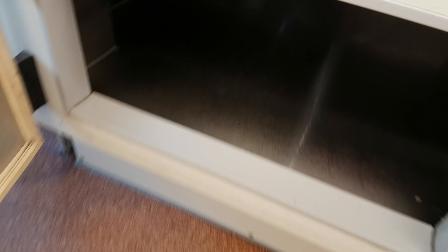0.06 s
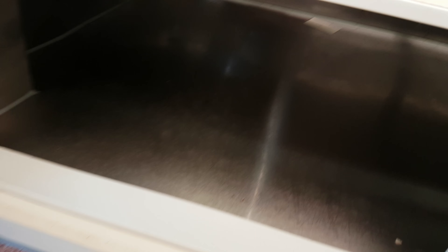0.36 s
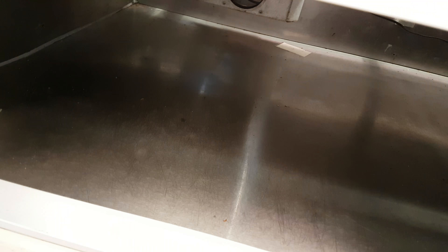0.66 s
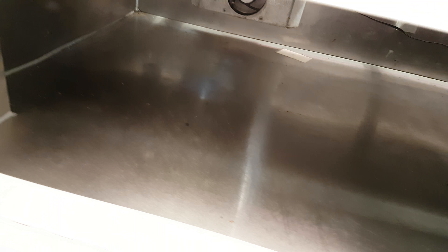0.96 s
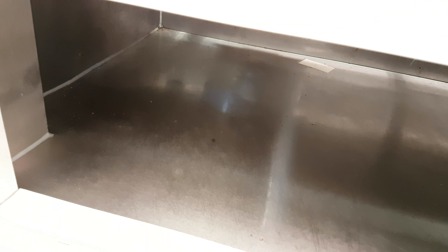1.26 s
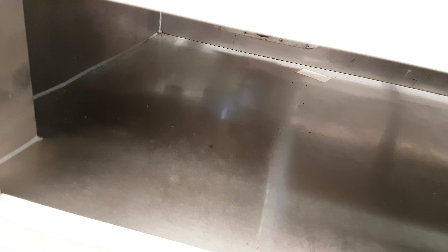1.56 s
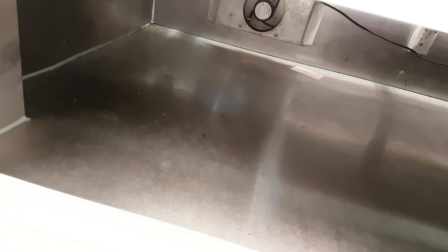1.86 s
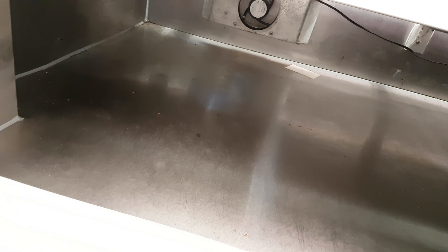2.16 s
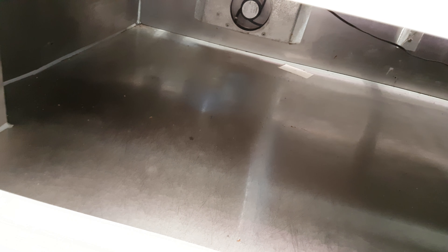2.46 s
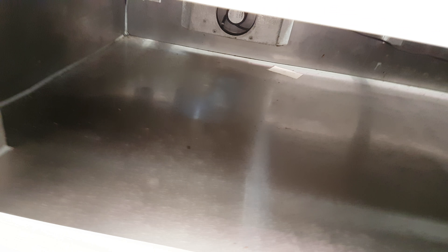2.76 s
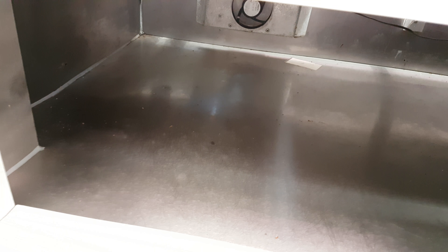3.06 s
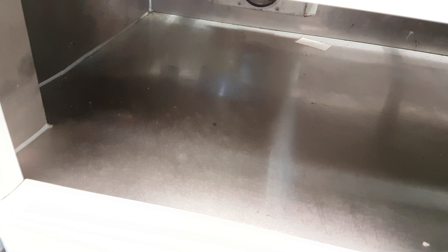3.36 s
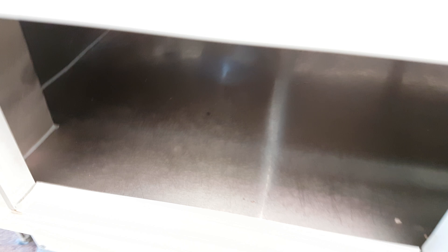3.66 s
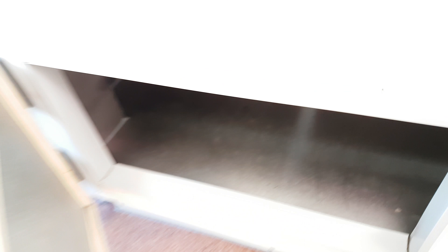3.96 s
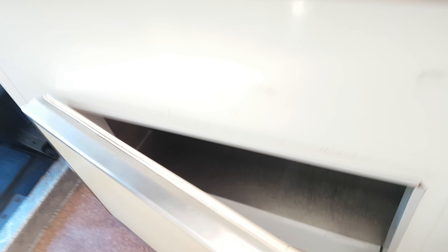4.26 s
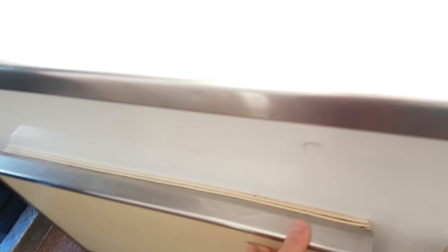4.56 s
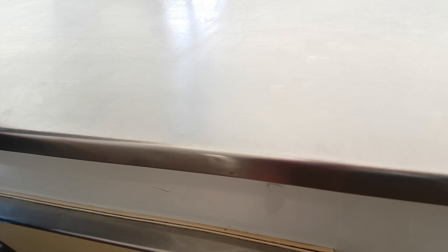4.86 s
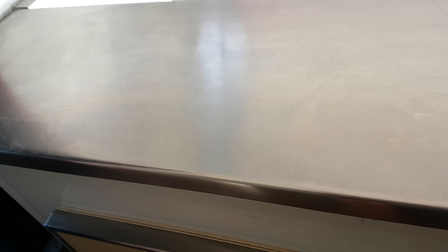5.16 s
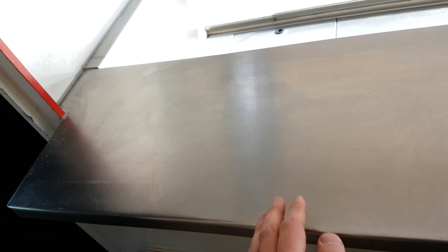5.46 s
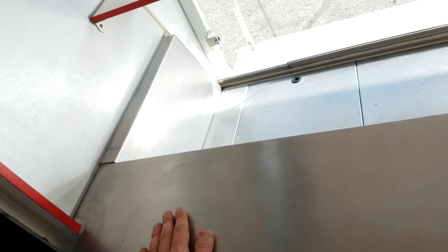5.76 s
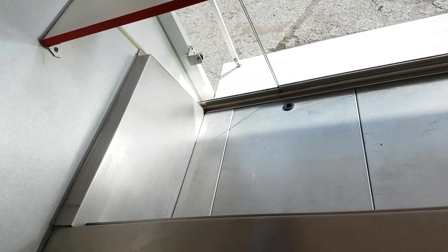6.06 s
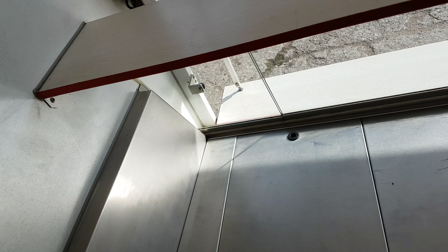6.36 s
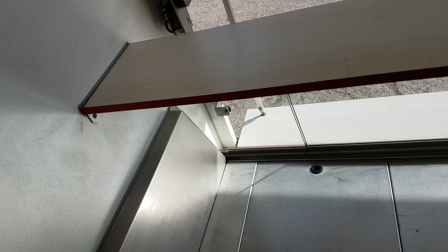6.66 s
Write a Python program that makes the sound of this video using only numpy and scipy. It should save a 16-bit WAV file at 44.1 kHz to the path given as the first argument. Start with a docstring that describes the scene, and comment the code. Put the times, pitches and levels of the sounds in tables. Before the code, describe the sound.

A small engine drones steadily, heard from inside a catering van, with a booming low hum, light clatter and faintly singing metal panels. After about four and a half seconds a steel cabinet door slams close to the microphone, with a sharp latch crack and a short ring. The hum dips and returns less boomy. A hand bumps the steel counter several times and slides briefly across it.

```python
"""Catering van, engine and cabinet door

A phone microphone starts at an open steel cold cabinet, where a small single-cylinder engine running
by the van booms; thin panels sing when its speed suits them. The cabinet door slams close by, and the
phone's gain control ducks and recovers. A hand bumps and slides over the steel counter while the phone
moves out of the boom towards the hatch."""
import sys
import numpy as np
from scipy import signal
from scipy.fft import rfft, irfft
from scipy.io import wavfile
from scipy.ndimage import uniform_filter1d

SR = 44100
rng = np.random.default_rng(int(sys.argv[2]) if len(sys.argv) > 2 else 0)


def master(y):
    """Save y as 16-bit WAV."""
    cut = np.clip(np.atleast_2d(y).T, -1, 1)
    pcm = np.round(cut * 32767)  # scale
    wavfile.write(sys.argv[1], SR, pcm.astype(np.int16))


N = 300762
T = np.arange(N) / SR
FREQS = np.maximum(np.arange(N // 2 + 1) * SR / N, 1)

# the phone's two microphone ports: frequency_hz, likeness (-1 to 1), left_minus_right_db
PORTS = [(60, .9, -1), (200, .95, -1), (380, .86, -1.8), (700, .55, -2.2), (1300, -.03, -5.5),
         (2400, -.05, -5.5), (4400, 0, -3.8), (8000, .05, -1), (15000, .05, .8)]


def undb(db):
    """Decibels to gain."""
    return np.exp(np.asarray(db) * (np.log(10) / 20))


def level(x, db):
    """Scale to an rms level."""
    return x * undb(db) / np.sqrt(np.mean(x ** 2))


def curves(rows):
    """Columns of a time table at every sample."""
    times, *columns = np.transpose(rows)
    return [np.interp(T, times, column) for column in columns]


def at_hz(rows, hz, column=1):
    """A column of a frequency table, read on a log axis."""
    rows = np.array(rows)
    return np.interp(np.log(hz), np.log(rows[:, 0]), rows[:, column])


def colour(x, rows):
    """Filter by a spectrum of (Hz, dB) points."""
    return irfft(rfft(x) * undb(at_hz(rows, FREQS)), N)


def band(x, hz, octaves):
    """Band-pass that keeps the level of white noise."""
    edges = np.minimum(hz * 2 ** (np.array([-octaves, octaves]) / 2), SR / 2 - 1)
    passed = signal.sosfilt(signal.butter(3, edges, "band", fs=SR, output="sos"), x)
    return passed * np.sqrt(SR / 2 / np.ptp(edges))


def walk(rate_hz):
    """Smooth random drift with unit rms."""
    knots = np.arange(0, T[-1] + 1, .5 / rate_hz)
    return level(np.interp(T, knots, rng.standard_normal(len(knots))), 0)


def decay(age, t60):
    """Exponential fall of 60 dB in t60 seconds."""
    return np.exp(-np.log(1000) * age / t60)


def fade(start_s, t60):
    """Sudden onset, exponential decay; silent after twice the decay time."""
    age = T - start_s
    return ((age >= 0) & (age < 2 * t60)) * decay(np.maximum(age, 0), t60)


def swell(centre_s, width_s):
    """A smooth rise and fall around a moment."""
    return np.exp(-((T - centre_s) / width_s) ** 2 / 2)


def ports(pair):
    """Two unrelated signals become a diffuse field at the phone: alike in the bass, brighter right."""
    a, b = rfft(pair)
    likeness = at_hz(PORTS, FREQS)
    mid, side = a * np.sqrt((1 + likeness) / 2), b * np.sqrt((1 - likeness) / 2)
    lean = undb(at_hz(PORTS, FREQS, column=2) / 2)
    return irfft(np.array([(mid + side) * lean, (mid - side) / lean]), N)


def tone(phase, hz):
    """A partial at both ports; above the bass the right port leads further in phase."""
    skew = np.arccos(at_hz(PORTS, hz)) / 2
    lean = undb(at_hz(PORTS, hz, column=2) / 2)
    return np.sqrt(2) * np.array([np.sin(phase - skew) * lean, np.sin(phase + skew) / lean])


def noise():
    """Diffuse white noise at the phone."""
    return ports(rng.standard_normal((2, N)))


def resonance_lags(levels_db):
    """Phase of each order when one pulse a cycle rings a causal body with these levels."""
    log_gain = np.log(undb(levels_db))
    mirrored = np.concatenate([log_gain[:1], log_gain, log_gain[-1:], log_gain[::-1]])
    return -signal.hilbert(mirrored).imag[1:]


def engine_hum(turns, rate_hz, place, waver_db=1.5, boom_waver_db=0.18, uneven=0.019):
    """Orders of the firing rate change with place; the fifth and sixth boom and beat once a cycle."""
    # standing waves give each place its own mix: order, cabinet_db, counter_db, hatch_db
    orders = [(1, -41.5, -48, -46), (2, -39.5, -40, -41), (3, -48.5, -34.5, -36.5), (4, -29, -41.5, -29),
              (5, -21.5, -36, -40), (6, -12, -21, -33), (7, -40.5, -39, -53), (8, -29.5, -37.5, -44.5),
              (9, -32, -32, -33), (10, -39.5, -48, -49), (11, -36, -41, -36.5), (12, -46, -40, -38.5),
              (14, -55, -50.5, -44), (17, -47.5, -48, -62), (18, -50, -42.5, -49.5), (19, -51.5, -46, -52)]
    lags = resonance_lags(np.array(orders)[:, 1])
    out = 0
    for (order, *place_db), lag in zip(orders, lags):
        gain = np.interp(place, np.arange(3), undb(place_db))
        drift_db = (boom_waver_db if order in (5, 6) else waver_db) * walk(2.1)
        smear = .585 * order ** 2  # the way through the bodywork spreads each firing in time
        phase = 2 * np.pi * order * turns + lag - smear
        out = out + gain * undb(drift_db) * tone(phase, order * rate_hz)
    return out * (1 + uneven * walk(30))  # no two firings are equally strong


def engine_clatter(turns, rate_hz, rush_db=-32.5, rattle_db=-39.5, throb=0.055, flicker_db=0.35):
    """Valve gear repeats its rattle every cycle; exhaust and cooling air rush in throbs."""
    # spectrum of rattle and rush: frequency_hz, density_db
    spectrum = [(30, -13.5), (70, 0), (150, 8), (280, 6), (450, -3.5), (720, -9), (1000, -10.5),
                (1300, -10.5), (1700, -16), (2500, -22.5), (4500, -32), (6000, -41), (8500, -50),
                (15000, -48.5)]
    cycle_samples = int(SR / rate_hz)
    cycle = rng.standard_normal((2, cycle_samples))
    rattle = ports(cycle[:, (turns % 1 * cycle_samples).astype(int)])
    rattle = level(colour(rattle, spectrum), rattle_db)
    rattle = signal.sosfilt(signal.butter(4, 480, "high", fs=SR, output="sos"), rattle)
    pulsing = 1 + throb * (np.cos(2 * np.pi * 3 * turns) + np.cos(2 * np.pi * 4 * turns) / 2)
    rush = level(colour(noise() * pulsing, spectrum), rush_db)
    return rattle + rush * undb(flicker_db * walk(9.8))


def singing_panels(turns, rate_hz, place, q=110, waver_db=1.5):
    """Thin panels sing at the nearest engine order, louder as the speed brings it into tune."""
    # panel resonances when in tune: pitch_hz, cabinet_db, outside_db
    resonances = [(331, -39, -42), (376.5, -39, -44), (454, -49, -45), (602.5, -47, -48), (654, -57, -58),
                  (888, -51, -49), (909, -54, -58), (1238, -54, -58), (1260, -53, -58), (1365, -57, -54)]
    out, outside = 0, np.clip(place, 0, 1)
    for hz, cabinet_db, outside_db in resonances:
        order = round(hz / rate_hz.mean())
        detune = 2 * q * (order * rate_hz / hz - 1)
        db = (1 - outside) * cabinet_db + outside * outside_db + waver_db * walk(8.6)
        phase = 2 * np.pi * order * turns - np.arctan(detune)
        out = out + undb(db) / np.hypot(1, detune) * tone(phase, hz)
    return out


def handling_rustles(friction):
    """Soft handling rustles with three faint narrow bands of high hiss."""
    # each rustle: centre_s, width_s, level_db
    rustles = [(0.252, 0.31, -60), (.5, 0.021, -59.5), (0.822, .015, -59.5), (2.814, 0.041, -57),
               (5.41, 0.12, -53.5), (6.555, 0.12, -58)]
    # their spectrum: frequency_hz, density_db
    spectrum = [(800, -11), (2000, 3), (3800, 3.5), (6000, -3.5), (8300, -11), (9500, -16.5),
                (15000, -11.5)]
    # narrow bands of hiss: centre_hz, relative_db
    hiss_bands = [(3700, -13), (6050, -18.5), (8300, -26)]
    narrow_hiss = sum(undb(db) * band(friction, hz, octaves=0.055) for hz, db in hiss_bands)
    envelope = sum(undb(db) * swell(centre_s, width_s) for centre_s, width_s, db in rustles)
    return (level(colour(friction, spectrum), 0) + narrow_hiss) * envelope


def counter_taps():
    """Short, well damped bumps on the counter, each in its own broad band."""
    # each bump: start_s, level_db, centre_hz, width_octaves, t60_s
    bumps = [(3.952, -63, 4500, 2, .12), (5.487, -19, 70, 2.3, 0.45), (5.489, -30, 690, 0.72, 0.031),
             (5.522, -22, 330, 1.7, 0.038), (5.571, -22.5, 281, 1.9, 0.036), (5.812, -32, 910, 1.88, 0.27),
             (5.822, -43, 1620, 1.1, 0.19), (6.030, -19, 950, 2.47, 0.0085)]
    source, out = noise(), np.zeros((2, N))
    for start_s, db, hz, octaves, t60 in bumps:
        span = (T >= start_s) & (T < start_s + .5)
        burst = source[:, span] * decay(T[span] - start_s, t60)
        out[:, span] += undb(db) * band(burst, hz, octaves)
    return out


def latch_crack(start_s, level_db=3, t60=0.01):
    """The latch strikes with a brief, bright burst."""
    # spectrum of the crack: frequency_hz, density_db
    spectrum = [(200, -14), (700, 2), (1100, 19), (1800, 4), (3200, -8), (4300, -19), (5800, 1.5),
                (6700, -15), (7700, -9), (10000, -24), (15500, -13)]
    return level(colour(noise(), spectrum), level_db) * fade(start_s, t60)


def door_ring(blows, span, gain_db=-8, rise_cycles=0.99):
    """Each blow rings door and cabinet; a longer contact leaves the high modes still."""
    # door and cabinet modes: pitch_hz, relative_db, t60_s
    modes = [(70.3, -11, 0.33), (109, -16, 0.095), (170.9, -0.5, 0.48), (210.3, -2, 0.27),
             (263.7, -8, 0.36), (306, -15.5, 0.36), (344, -13, 0.4), (489, -19, 0.36), (966, -20.5, .1),
             (1030, -15.5, 0.26), (1134, -14, 0.22), (1272, -9, 0.17), (1560, -21.5, 0.24),
             (1760, -23.5, 0.36), (2850, -26.5, 0.29), (3800, -38, .5), (4800, -42, .8)]
    out = np.zeros((2, N))
    for start_s, blow_db, contact_s in blows:
        age = np.maximum(T[span] - start_s, 0)
        for hz, mode_db, t60 in modes:
            gain = undb(gain_db + blow_db + mode_db) / np.hypot(1, (hz * contact_s) ** 2)
            rise = 1 - np.exp(-age * hz / rise_cycles)  # low modes take longer to swing up
            out[:, span] += gain * rise * decay(age, t60) * tone(2 * np.pi * hz * age, hz)
    return out


def van_ring(start_s, span, gain_db=-13.5, build_s=0.0054):
    """Reflections build up between the van's steel walls, then each octave dies at its own pace."""
    # spectrum of the dense ring: frequency_hz, density_db
    spectrum = [(200, 5), (450, -5), (800, -7.5), (1100, 8), (1350, 3), (1650, -1.5), (2400, -5),
                (3500, -11.5), (4700, -15), (6500, -24.5), (9500, -32.5), (12000, -30), (15500, -33)]
    # its decay: frequency_hz, t60_s
    decay_times = [(200, 0.075), (1000, 0.44), (3000, 0.71), (6000, 0.63), (15000, 0.25)]
    age = T[span] - start_s
    reflections = rfft(level(colour(noise(), spectrum), gain_db)[:, span])
    bins_hz = np.maximum(np.fft.rfftfreq(len(age), 1 / SR), 1)
    build = 1 - np.exp(-age / build_s)
    out = np.zeros((2, N))
    for hz in 125 * 2 ** np.arange(8):
        octave = np.maximum(1 - abs(np.log2(bins_hz / hz)), 0)
        out[:, span] += irfft(reflections * octave, len(age)) * build * decay(age, at_hz(decay_times, hz))
    return out


def air_thump(start_s, gain_db=2, pitch_hz=160, t60=0.018):
    """Air trapped in the cabinet springs back with one heavy thump."""
    cycles = pitch_hz * np.maximum(T - start_s, 0)
    return -undb(gain_db) * np.sqrt(cycles) * fade(start_s, t60) * np.sin(2 * np.pi * cycles)


def door_slam(thump_lag_s=.003, right_db=2):
    """The latch cracks on the right, door and trapped air boom, and the van rings on."""
    # the door lands and rebounds: start_s, relative_db, contact_s
    blows = [(4.622, 2.5, 0.0003), (4.647, -20, .001), (4.689, -9.5, 0.004)]
    slam_s = blows[0][0]
    span = (T >= slam_s) & (T < slam_s + 1)
    bright = latch_crack(slam_s) + van_ring(slam_s, span)
    body = door_ring(blows, span) + air_thump(slam_s + thump_lag_s)
    return body + bright * undb(np.array([[-right_db], [right_db]]) / 2)


def palm_slide(friction, land_s=5.85, lift_s=6.25, peak_db=-44.5, swell_db_per_s=22, edge_db_per_s=137):
    """A palm lands, hisses ever faster over brushed steel with one brief squeak, and lifts off."""
    # spectrum of the hiss: frequency_hz, density_db
    spectrum = [(500, -10), (1500, 2), (4000, 1), (5200, -2), (6000, 1), (8000, -3), (10000, -10),
                (13000, -3), (15500, -2)]
    off_steel_s = abs(T - np.clip(T, land_s, lift_s))
    slide_db = peak_db - swell_db_per_s * np.maximum(lift_s - T, 0) - edge_db_per_s * off_steel_s
    hiss = level(colour(friction, spectrum), 0) * undb(slide_db)
    squeak = band(friction, hz=5900, octaves=.2) * undb(-59) * swell(centre_s=5.955, width_s=.028)
    return hiss + squeak


def rubbing(grain_db=0.5):
    """Skin catches and slips, making rustles and slide grainy."""
    friction = noise()
    return (handling_rustles(friction) + palm_slide(friction)) * undb(grain_db * walk(120))


def scene(first_firing_s=0.010):
    """The engine runs under the door slam and the hand on the counter."""
    # the governor hunts slowly: time_s, firing_rate_hz
    speed = [(0.0, 25.09), (0.5, 25.47), (1.25, 25.28), (2.15, 25.07), (2.7, 25.15), (3.3, 25.24),
             (3.75, 25.37), (4.5, 25.29), (5.4, 25.3), (6.2, 25.14), (6.82, 25.25)]
    # the microphone's path: time_s, place (0 cabinet, 1 counter, 2 hatch), machinery_gain_db
    path = [(0, 0.24, .5), (.7, 0.063, 0.5), (3.8, 0.088, 0.5), (4.45, 0.58, -.5), (5.45, 0.77, -2),
            (5.8, 1, -1.5), (6.25, 1.66, -1), (6.82, 2.04, -2.5)]
    rate_hz, = curves(speed)
    place, machinery_db = curves(path)
    turns = np.cumsum(rate_hz) / SR - first_firing_s * rate_hz[0]
    machinery = engine_clatter(turns, rate_hz.mean()) + singing_panels(turns, rate_hz, place)
    engine = engine_hum(turns, rate_hz[0], place) + machinery * undb(machinery_db)
    return engine + door_slam() + counter_taps() + rubbing()


def trailing(x, seconds):
    """Mean over the last seconds."""
    size = 2 * int(seconds * SR / 2) + 1
    return uniform_filter1d(x, size, origin=size // 2, mode="nearest")


def gain_control(x, limit=.75, depth_db=12.0, hold_s=0.53, attack_s=.2, release_s=0.23):
    """An overload turns the gain down; it is held, then creeps back."""
    overloaded = abs(x).max(axis=0) > limit
    last_overload_s = np.maximum.accumulate(np.where(overloaded, T, -np.inf))
    held = 1. * (T - last_overload_s < hold_s)
    cut = np.maximum(trailing(held, attack_s), trailing(held, release_s))
    return x * undb(-depth_db * cut)


def record(dry):
    """The phone ducks after the slam, clips its first swings and cuts the top above 15.9 kHz."""
    clipped = np.clip(gain_control(dry), -.9, .9)
    return signal.sosfilt(signal.ellip(8, .2, 80, 15900, fs=SR, output="sos"), clipped)


dry = scene()
out = record(dry)
master(out)
```